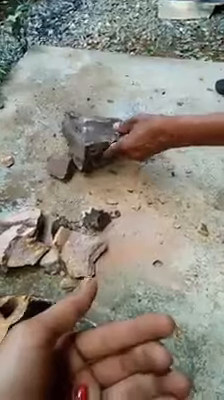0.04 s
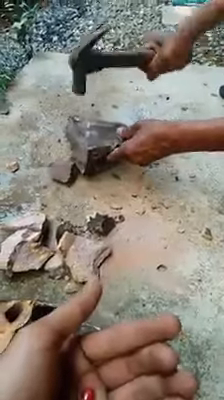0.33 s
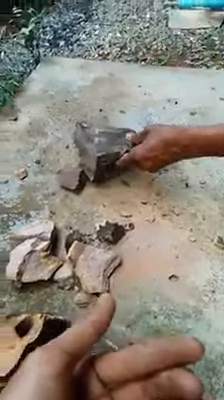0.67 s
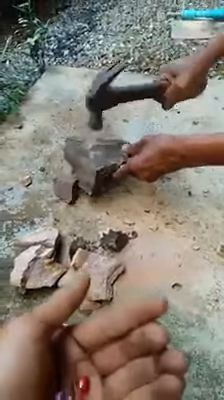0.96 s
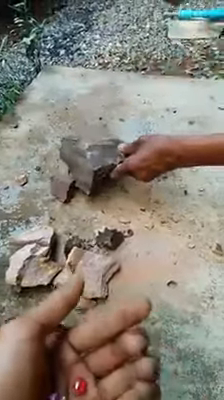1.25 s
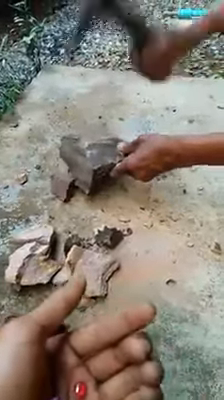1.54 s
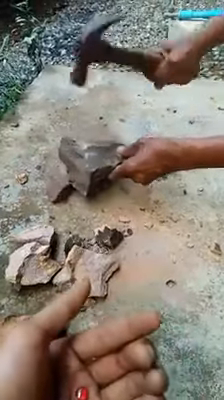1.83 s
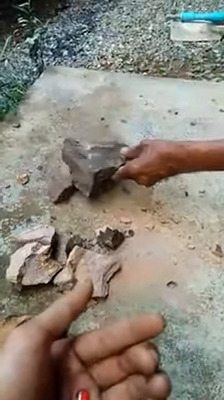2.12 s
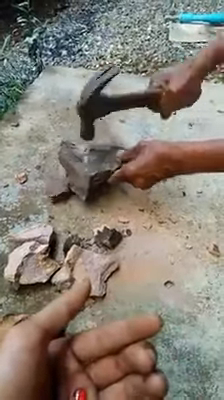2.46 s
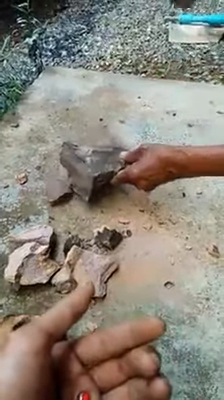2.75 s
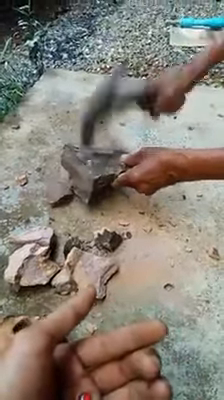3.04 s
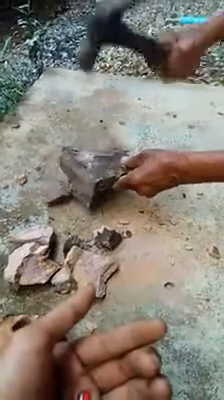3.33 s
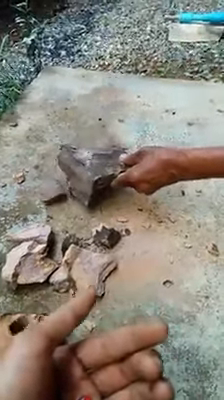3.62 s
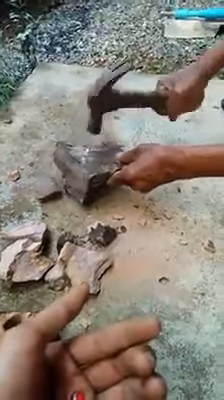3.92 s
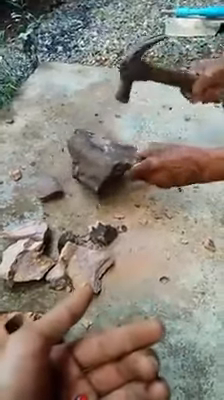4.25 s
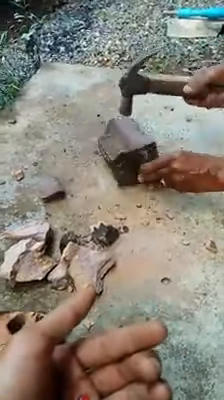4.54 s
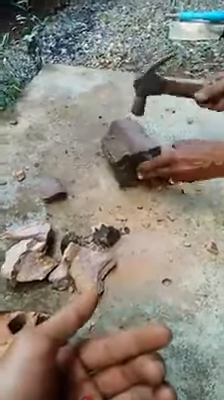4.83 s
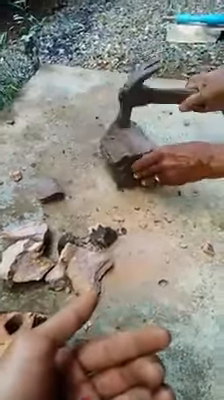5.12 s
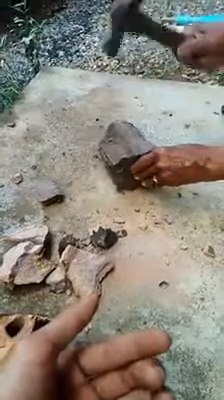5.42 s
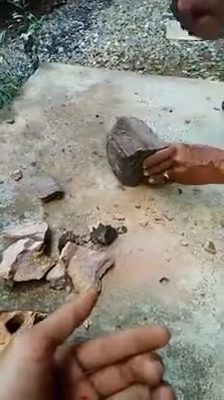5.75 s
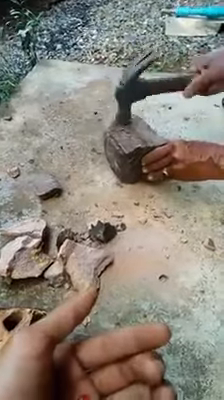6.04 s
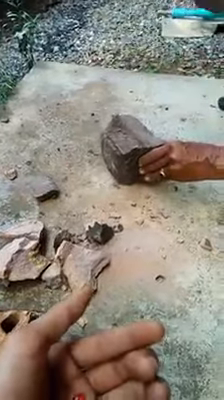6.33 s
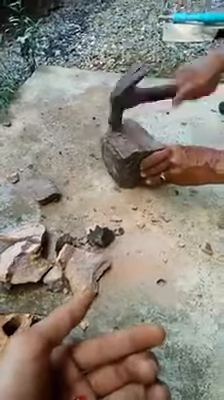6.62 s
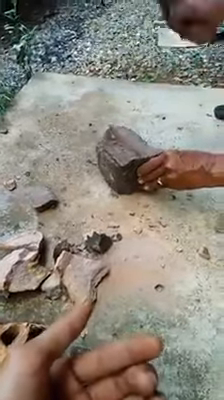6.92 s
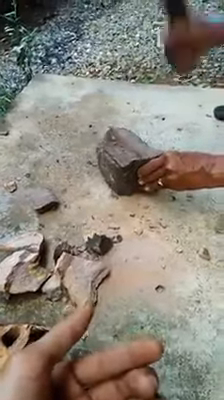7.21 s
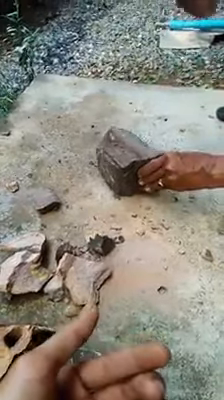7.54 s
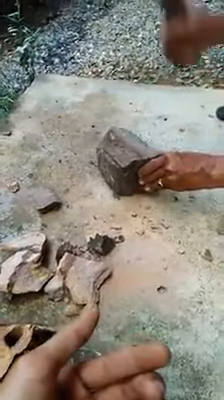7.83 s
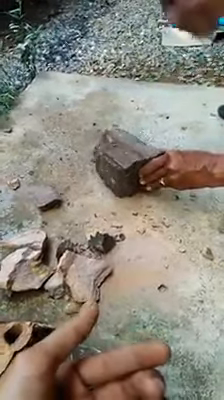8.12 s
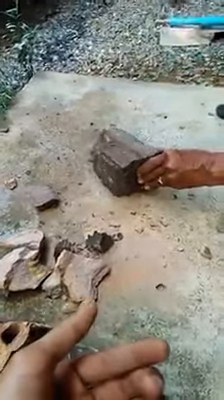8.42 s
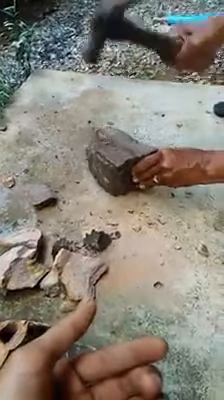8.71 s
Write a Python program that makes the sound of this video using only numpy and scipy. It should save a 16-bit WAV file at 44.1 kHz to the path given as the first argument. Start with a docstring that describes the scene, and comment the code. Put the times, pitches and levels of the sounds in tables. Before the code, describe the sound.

Steady hammer blows crack against a rough stone on a concrete slab, with small knocks and scuffs in a quiet yard.

```python
"""A quiet yard rumbles and hisses faintly. A steel hammer strikes a rough stone six times on a concrete
slab: the slab thuds, the stone rings, crushed grit cracks and nearby walls echo. After most blows the
stone hops and knocks back down. From 2 seconds on, far-off birds whistle. Midway the stone scuffs as it
is turned on edge and knocks on the slab. Two light taps follow, with more scuffs between them, and then
four harder blows. A fast limiter flattens the loudest peaks."""
import sys
import numpy as np
from scipy import signal
from scipy.fft import rfft, irfft, next_fast_len
from scipy.io import wavfile
from scipy.ndimage import uniform_filter1d, minimum_filter1d, map_coordinates

SR = 44100
rng = np.random.default_rng(int(sys.argv[2]) if len(sys.argv) > 2 else 0)


def wrap_up_sound(samples):
    """Save the sound to the file named by the first command line argument, as 16-bit audio."""
    columns = np.atleast_2d(samples).T
    # keep every value between -1 and 1, then stretch to whole-number steps
    tamed = np.clip(columns, -1, 1)
    steps = np.round(tamed * 32767).astype(np.int16)
    wavfile.write(sys.argv[1], SR, steps)


N = 386757

# All levels in the tables are relative. A fade time (t60) is how long a sound takes to fall by 60 dB.
# The tone of the outdoor background. Each row: frequency in Hz, level in dB.
AIR_TONE = [(25, -23.5), (58, 4), (85, -8), (130, -0.5), (215, -16.5), (310, -7.5), (480, -23.5),
            (1000, -23.5), (1700, -23.5), (2700, -30), (4500, -34), (6200, -38.5), (7200, -31), (8600, -38)]
# How the low background swells. Each row: time in seconds, rumble level in dB, drone level in dB.
LOW_LEVELS = [(0.0, -63, -73), (1.2, -65, -67.5), (1.43, -67.5, -76), (3.21, -63, -74.5),
              (6.11, -71, -77.5), (6.99, -60.5, -70.5), (8.6, -65, -70)]
# The tone of a high rustle. Each row: frequency in Hz, level in dB.
RUSTLE_TONE = [(5500, -39), (6500, -18), (7300, -1), (8000, 0.5), (8700, -6)]
# How the rustle comes and goes. Each row: time in seconds, level in dB.
RUSTLE_LEVELS = [(0, -96), (1.3, -77), (2.9, -93), (4.32, -74), (5.1, -82), (5.8, -74.5), (6.4, -95),
                 (7.1, -82.5), (8.7, -80.5)]
# The hammer hitting the stone. Each row: start in seconds, force in dB, grit level in dB.
HAMMER_BLOWS = [(.3226, 12.5, -5.5), (1.0038, 14, 9), (1.7340, 13.5, 7.5), (2.4693, 13.5, 7.5),
                (3.2090, 13.5, 10), (3.9012, 11, -1), (5.2715, 1, -11.5), (6.1328, -2.5, -25.5),
                (6.7737, 7.5, -15.5), (7.4066, 10, -9.5), (8.0305, 9.5, -9.5), (8.6544, 11.5, -5)]
# The stone knocking on the slab. Each row: start in seconds, force in dB, grit level in dB.
STONE_KNOCKS = [(.3965, -5.5, -23), (1.1126, 2, -23), (1.8301, -7, -21), (2.5810, 4, -20),
                (2.6210, -8.5, -26), (3.3177, -2, -18.5), (4.5975, -3.5, -56.5), (4.7053, -12.5, -53),
                (4.7869, -9.5, -51.5), (6.8264, -4, -30.5), (7.4757, -2.5, -26)]
# Modes are the notes a struck thing rings with. Each row: pitch in Hz, level in dB, fade time in seconds.
SLAB_MODES = [(144, -17, 0.042), (282, -21, 0.055), (450, -34, 0.0054), (680, -8.5, 0.032)]
STONE_MODES = [(309, -31.5, 0.048), (650.5, -10, 0.031), (1031, -6.5, 0.031), (1250, -22, 0.07),
               (1428, -16, 0.033), (1927, -19, 0.024)]
FLAT_MODES = [(2280, -25.5, 0.026), (2783, -18.5, 0.024), (4000, -27, 0.063)]  # the stone's high notes while it lies flat
EDGE_MODES = [(2130, -29.5, 0.082), (2440, -16, 0.022), (3490, -25.5, .018)]  # its high notes once it stands on edge
HAMMER_MODES = [(631, -37, 0.39), (733, -39.5, 0.34), (970, -39, 0.22), (1012, -33.5, 0.3),
                (1250, -42, .19), (1427, -38.5, 0.22), (1490, -33.5, 0.37), (1580, -39.5, 0.15),
                (1700, -42, 0.14), (1866, -36, 0.15), (1930, -36, 0.17), (2127, -39, 0.26),
                (4030, -28.5, 0.22), (4500, -31.5, 0.22)]  # the long ring of the hammer and the things around it
# The tone of crushed grit. Each row: frequency in Hz, level in dB.
GRIT_TONE = [(300, -14), (1000, -0.5), (1800, -0.5), (2500, 2), (3200, -6), (4200, -4), (5200, -4.5),
             (6300, -20.5), (7200, -7), (8500, -21)]
# The tone of the yard's reverb and of its faint far tail. Each row: frequency in Hz, level in dB.
YARD_TONE = [(40, -26.5), (145, -10.5), (230, -18), (320, -14), (400, -19.5), (650, -8.5), (1000, -5),
             (1600, -4.5), (2200, -9), (2900, -17), (4300, -10), (6200, -16), (7200, -8), (8600, -17)]
FAR_TONE = [(60, -45), (200, -40.5), (500, -44.5), (1000, -39.5), (1900, -38.5), (3000, -46), (6000, -48),
            (7300, -36.5)]
# Far-off bird notes. Each row: start in seconds, pitch in Hz, level in dB.
BIRD_NOTES = [(2.04, 1250, -60), (2.22, 1700, -67.5), (3.02, 3420, -75), (4.46, 3340, -74.5),
              (4.78, 3380, -74), (5.01, 1380, -70), (6.19, 1850, -65.5), (6.2, 1355, -62),
              (6.35, 1160, -61.5), (6.41, 2080, -66.5), (7.05, 2210, -73)]
# The stone scuffing as a hand shifts it. Each row: time in seconds, level in dB.
STONE_SCUFFS = [(4.305, -63), (5.728, -65), (5.794, -60), (5.870, -59), (5.907, -70)]
# How slab thud and yard sound follow the force. Each pair: dB at a force of 0 dB, dB per dB of force.
BLOW_THUD, BLOW_YARD = (-2.8, .52), (-8, .46)
KNOCK_THUD, KNOCK_YARD = (-8.5, 0.3), (-11, -0.18)


def from_db(db):
    """Turn decibels into a number to multiply by."""
    return 10 ** (np.asarray(db) / 20)


def rms_one(x):
    """Scale a sound so that its average strength (rms) is 1."""
    return x / np.sqrt(np.mean(x ** 2) + 1e-20)


def cut(x, hz, kind="low", order=2):
    """Keep the "low" or the "high" side of hz; a higher order cuts more steeply."""
    return signal.sosfilt(signal.butter(order, min(hz, .45 * SR), kind, fs=SR, output="sos"), x)


def colour(x, tone):
    """Make each frequency of a noise louder or softer, following a tone table."""
    size = next_fast_len(len(x), True)
    hz, db = np.transpose(tone)
    curve_db = np.interp(np.log(np.fft.rfftfreq(size, 1 / SR) + 1), np.log(hz), db)
    return irfft(rfft(x, size) * from_db(curve_db), size)[:len(x)]


def add(track, s, sound):
    """Mix a sound into a track, starting at s seconds."""
    start = round(s * SR)
    track[start:start + len(sound)] += sound[:N - start]


def background(split_hz=400, drone_from_hz=230, throb_hz=21.2, throb_db=3.5, hiss_db=-74):
    """A far-off rumble, a throbbing drone just above it and a faint steady hiss."""
    t = np.arange(N) / SR
    s, rumble_db, drone_db = np.transpose(LOW_LEVELS)
    throb = from_db(throb_db * np.sin(2 * np.pi * throb_hz * t))
    low = cut(colour(rng.standard_normal(N), AIR_TONE), split_hz, order=6)
    rumble = from_db(np.interp(t, s, rumble_db)) * rms_one(cut(low, drone_from_hz, order=4))
    drone = rms_one(throb * cut(low, drone_from_hz, "high", order=4))
    drone *= from_db(np.interp(t, s, drone_db) - 1.5)
    hiss = cut(colour(rng.standard_normal(N), AIR_TONE), split_hz, "high", order=4)
    return rumble + drone + from_db(hiss_db) * rms_one(hiss)


def rustle(swing_db=2, changes_per_s=6):
    """A thin, high noise that comes and goes, wavering at random."""
    t = np.arange(N) / SR
    wander = map_coordinates(rng.standard_normal(1000), [t * changes_per_s], order=3, mode="wrap")
    level_db = np.interp(t, *np.transpose(RUSTLE_LEVELS)) + swing_db * wander
    return from_db(level_db) * rms_one(colour(rng.standard_normal(N), RUSTLE_TONE))


def ring(modes, t):
    """A struck thing rings with fading notes; each spot that is hit stirs them a little differently."""
    hz, db, t60 = np.array(modes).T[:, :, None]
    db = db + rng.standard_normal(db.shape)
    sign = (-1) ** np.arange(len(modes))[:, None]
    return np.sum(sign * from_db(db - 60 * t / t60) * np.sin(2 * np.pi * hz * t), axis=0)


def crushed_grit(t, t60=.035):
    """Grit breaks in a quickly fading shower of tiny cracks, scaled to an energy of 1."""
    cracks = rng.standard_normal(len(t)) * from_db(-0.5 * rng.standard_normal(len(t)))
    burst = colour(cracks, GRIT_TONE) * from_db(-60 * t / t60)
    return burst / np.sqrt(np.sum(burst ** 2))


def impacts(hits, thud_rule, yard_rule, turned_s=4.4, ring_rise_s=.0027, slab_lead_s=.0065):
    """Each hit shakes stone, hammer and slab. Returns the direct sound and the yard's reverb."""
    direct, reverb = np.zeros((2, N))
    t = np.arange(int(.6 * SR)) / SR
    for s, force_db, grit_db in hits:
        thud_gain = from_db(thud_rule[0] + thud_rule[1] * force_db)
        yard_gain = from_db(yard_rule[0] + yard_rule[1] * force_db)
        # A bare, hard spot gives much grit and a short, bright contact; a dusty one a long, dull one.
        contact_ms = 0.53 * 2 ** (-grit_db / 33.5)
        top_hz = 1000 / contact_ms
        stone = ring(STONE_MODES + (FLAT_MODES if s < turned_s else EDGE_MODES), t)
        hammer = yard_gain * ring(HAMMER_MODES, t) * (1 - np.exp(-t / ring_rise_s))
        grit = from_db(grit_db + 2.5) * crushed_grit(t)
        add(direct, s, from_db(force_db) * cut(stone + hammer + 1e-18, top_hz, order=3) + grit)
        # The slab is pushed down, and its wave outruns the sound in the air.
        thud = cut(ring(SLAB_MODES, t) + 1e-18, top_hz / 1.9, order=4)
        add(direct, s - slab_lead_s, -thud_gain * thud)
        # The click of the contact and the crack of the grit spread into the yard.
        click = from_db(force_db + 23.5) * cut(signal.unit_impulse(len(t)) + 1e-18, top_hz, order=3)
        outgoing = yard_gain * (click + from_db(8.5) * grit)
        add(reverb, s, signal.fftconvolve(outgoing, yard_reverb(t))[:len(t)])
    return np.array([direct, reverb])


def yard_reverb(t, build_s=.014, near_t60=0.26, far_t60=0.78):
    """Many small echoes build up and die away, in a new pattern for every hit."""
    near_fade = from_db(-60 * t / near_t60)
    near = colour(rng.standard_normal(len(t)), YARD_TONE) * near_fade
    far = colour(rng.standard_normal(len(t)), FAR_TONE) * from_db(-60 * t / far_t60)
    build = 1 - np.exp(-(t / build_s) ** 2)
    return (near + far) * build / np.linalg.norm(build * near_fade)


def wall_echo(x, delay_s=.0355):
    """One faint, dull echo from the nearest wall."""
    echo = np.zeros(N)
    add(echo, delay_s, from_db(-22) * cut(x, hz=1800))
    return echo


def birds(note_s=.16, glide_share=.04, waver_hz=38.0, blur_hz=90):
    """Faint whistles that slide up or down, blurred by distance."""
    out, count = np.zeros(N), int(note_s * SR)
    for s, pitch_hz, db in BIRD_NOTES:
        waver = rms_one(cut(rng.standard_normal(SR), blur_hz))[-count:]
        glide = glide_share * rng.standard_normal() * np.linspace(-.5, .5, count)
        hz = pitch_hz * (1 + glide) + waver_hz * waver
        add(out, s, from_db(db) * np.hanning(count) * np.sin(2 * np.pi * np.cumsum(hz) / SR))
    return out


def scuffs(bump_s=.0054, trickle_s=.022, sand_db=-15):
    """Sand rolls under the stone and makes it ring softly: a short bump, then a longer trickle."""
    out, t = np.zeros(N), np.arange(int(.25 * SR)) / SR
    bump, trickle = (t / peak_s * np.exp(1 - t / peak_s) for peak_s in (bump_s, trickle_s))
    for s, db in STONE_SCUFFS:
        grains = rng.standard_normal(len(t)) * from_db(2.4 * rng.standard_normal(len(t)))
        stone = signal.fftconvolve(grains, ring(STONE_MODES, t))[:len(t)]
        stone = rms_one(cut(stone, hz=1300))
        sand = rms_one(cut(colour(grains, GRIT_TONE), hz=4200, kind="high", order=4))
        add(out, s - bump_s, from_db(db) * (bump * stone + from_db(sand_db) * trickle * sand))
    return out


def scene():
    """Mix the blows and knocks with their echoes and the quiet sounds, in one channel."""
    blows = impacts(HAMMER_BLOWS, BLOW_THUD, BLOW_YARD)
    knocks = impacts(STONE_KNOCKS, KNOCK_THUD, KNOCK_YARD)
    direct, reverb = blows + knocks
    direct = cut(direct, hz=59, kind="high")
    return (direct + wall_echo(direct) + reverb + scuffs() + birds() + background() + rustle())[None]


def limiter(x, ceiling_db=1.0, release_db_per_s=3000):
    """Turn the sound down just before a loud peak; the level comes back within milliseconds."""
    over_db = np.maximum(20 * np.log10(np.abs(x) + 1e-9) - ceiling_db, 0)
    ramp_db = release_db_per_s * np.arange(N) / SR
    held_db = np.maximum.accumulate(over_db + ramp_db, axis=-1) - ramp_db
    gain_db = uniform_filter1d(minimum_filter1d(-held_db, size=31), size=31)
    return x * from_db(gain_db)


def record(dry, round_to=1.1, cutoff_hz=8650):
    """Limit the peaks, round them off and steeply cut the highest treble."""
    rounded = round_to * np.tanh(limiter(dry) / round_to)
    return signal.sosfilt(signal.ellip(10, .2, 80, cutoff_hz, fs=SR, output="sos"), rounded)


dry = scene()
out = record(dry)
wrap_up_sound(out)
```